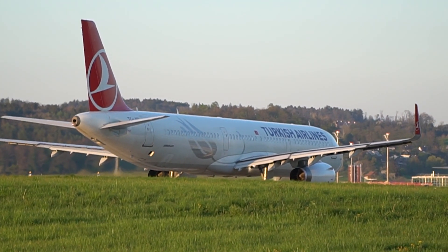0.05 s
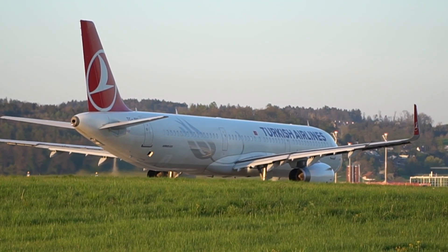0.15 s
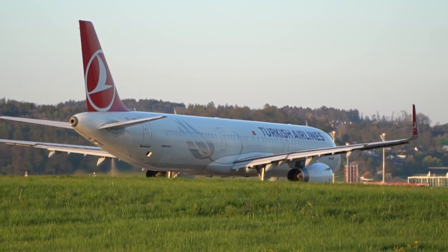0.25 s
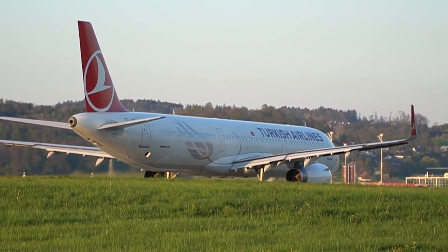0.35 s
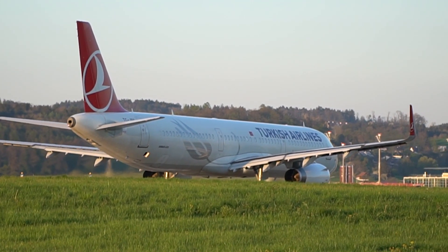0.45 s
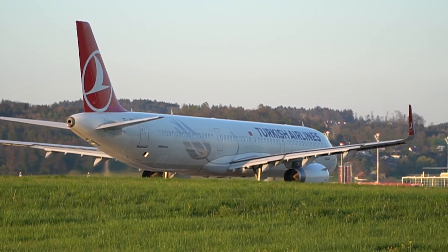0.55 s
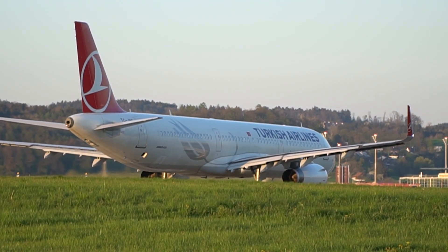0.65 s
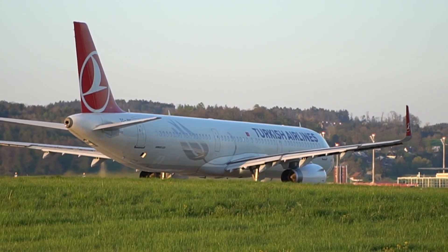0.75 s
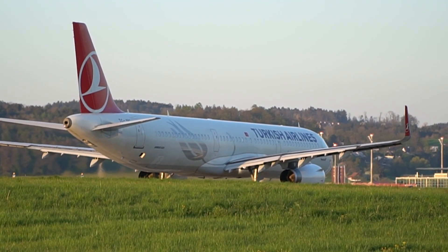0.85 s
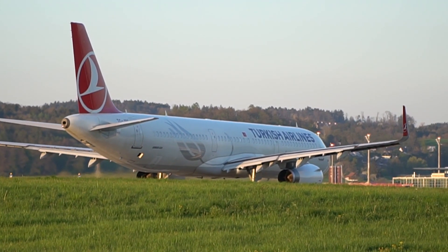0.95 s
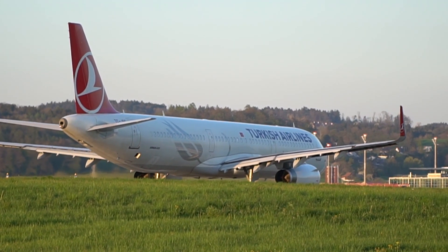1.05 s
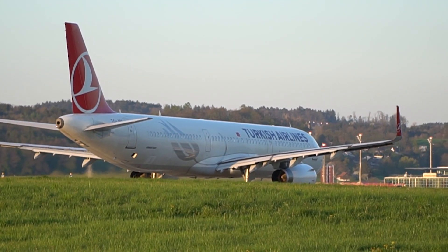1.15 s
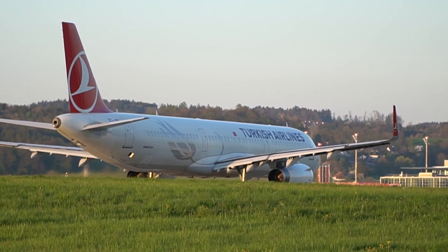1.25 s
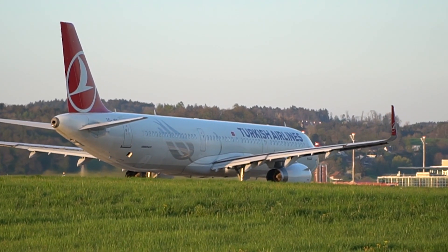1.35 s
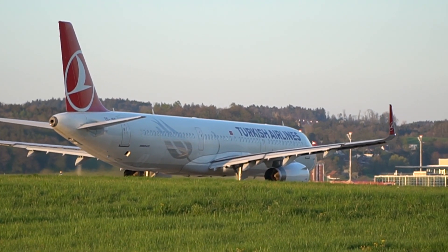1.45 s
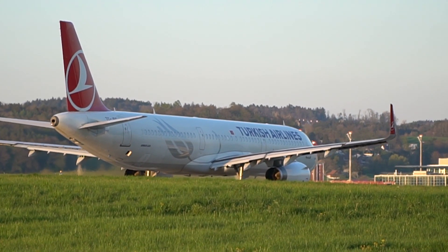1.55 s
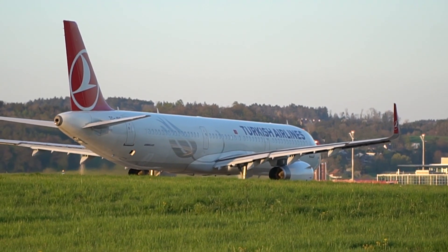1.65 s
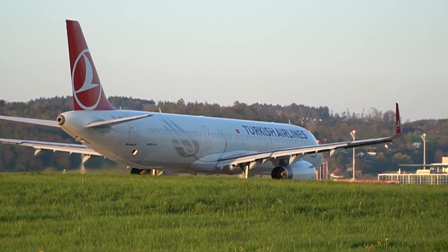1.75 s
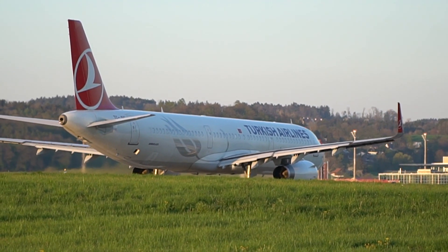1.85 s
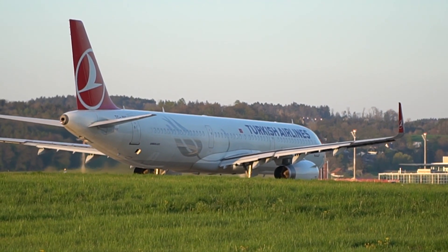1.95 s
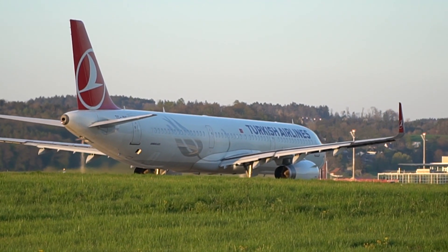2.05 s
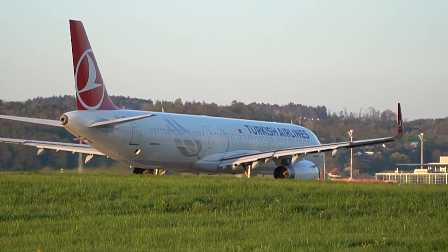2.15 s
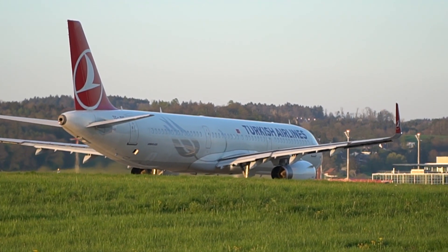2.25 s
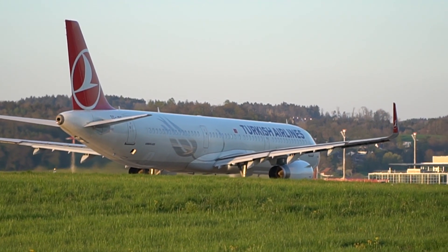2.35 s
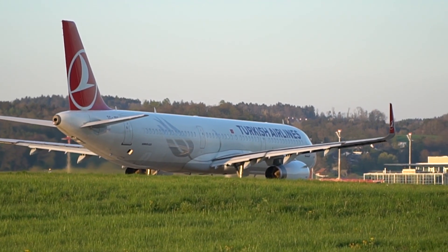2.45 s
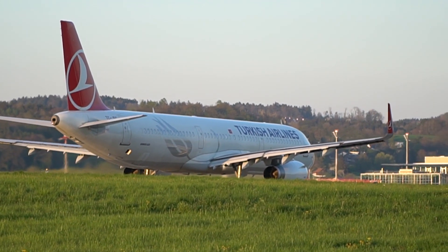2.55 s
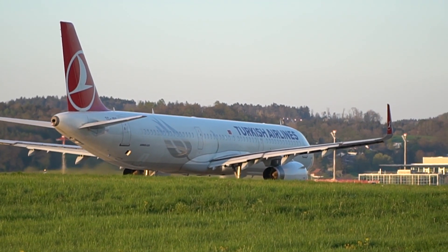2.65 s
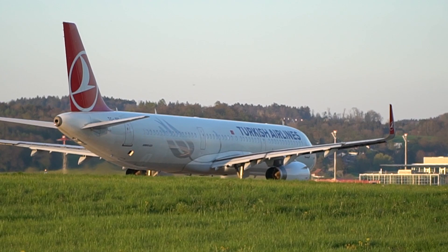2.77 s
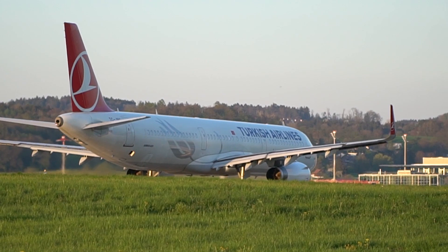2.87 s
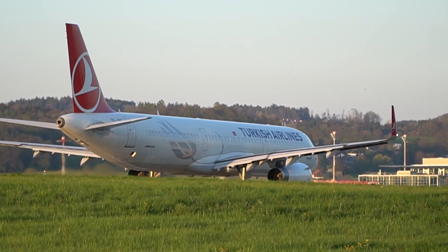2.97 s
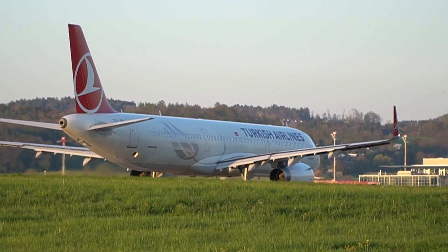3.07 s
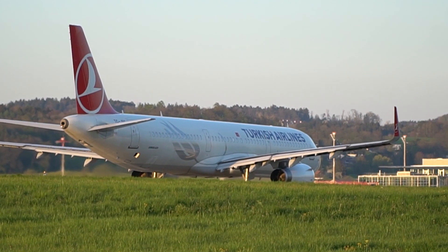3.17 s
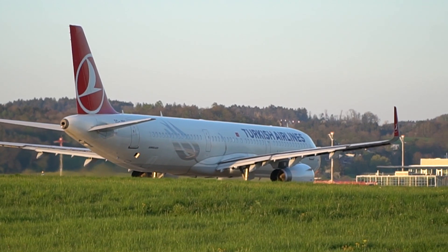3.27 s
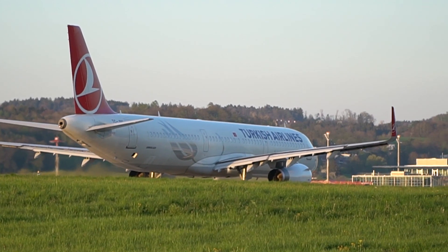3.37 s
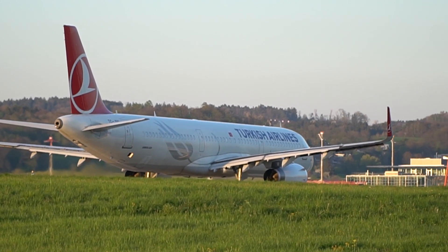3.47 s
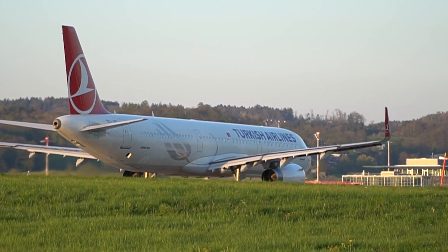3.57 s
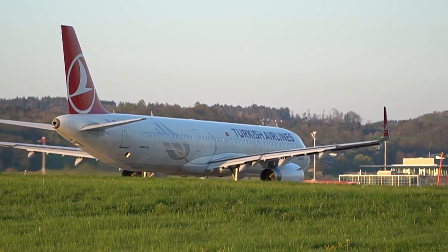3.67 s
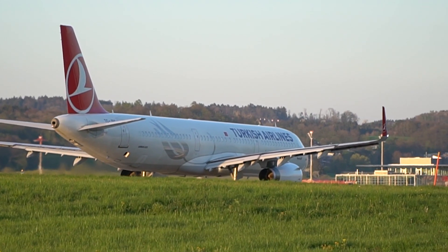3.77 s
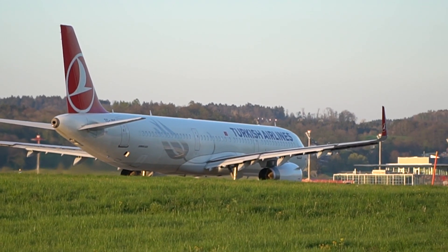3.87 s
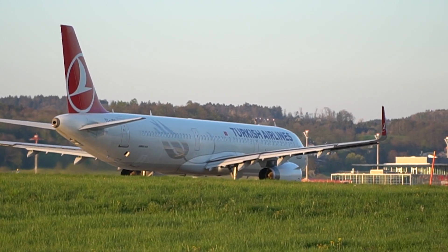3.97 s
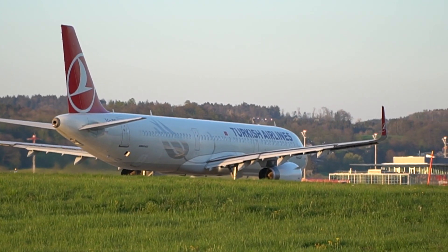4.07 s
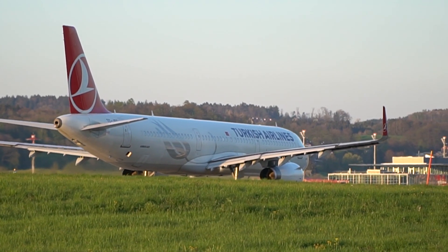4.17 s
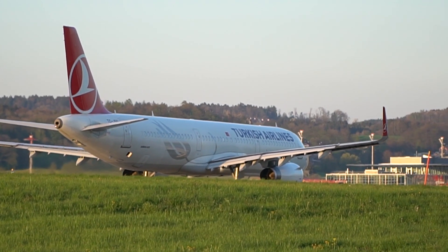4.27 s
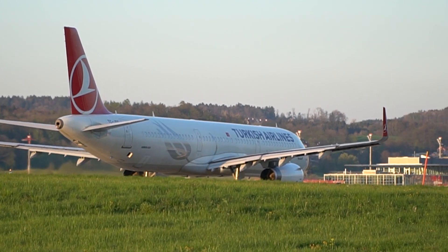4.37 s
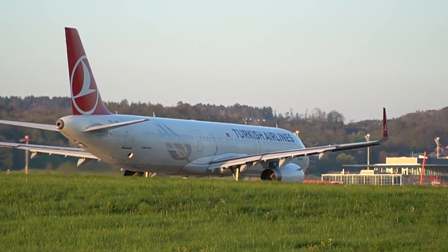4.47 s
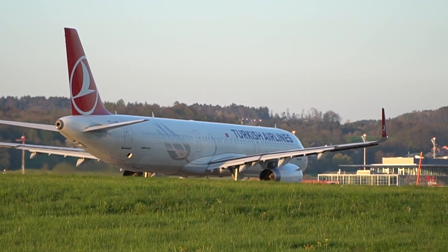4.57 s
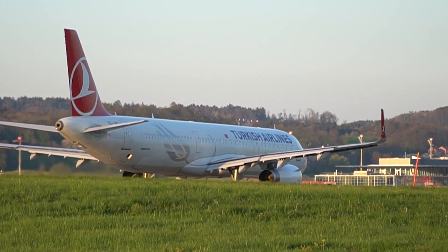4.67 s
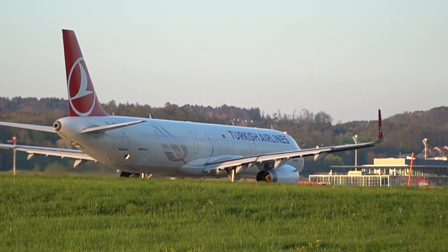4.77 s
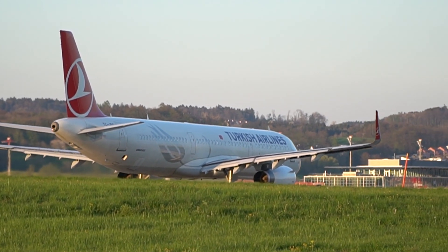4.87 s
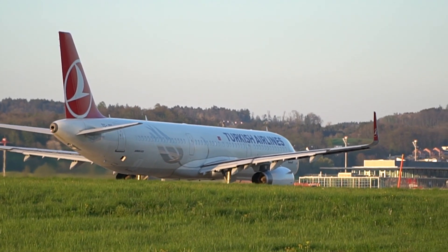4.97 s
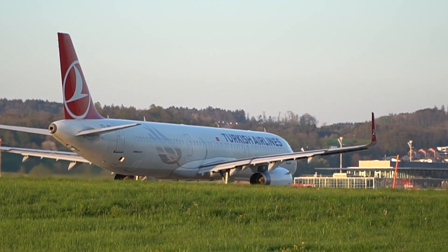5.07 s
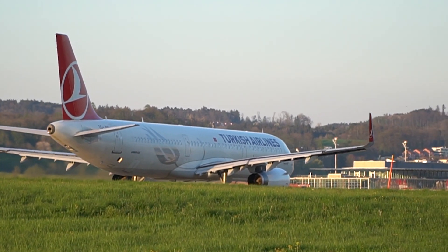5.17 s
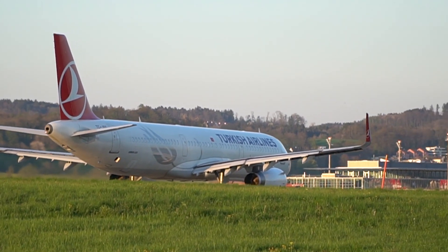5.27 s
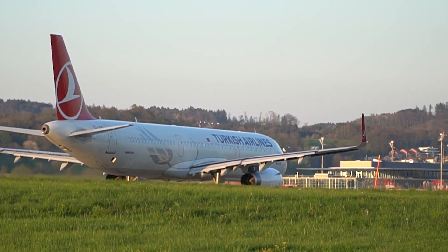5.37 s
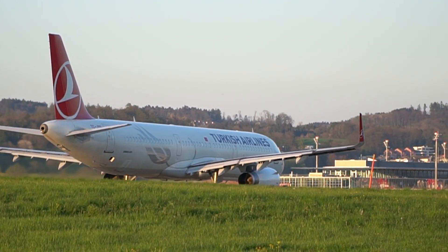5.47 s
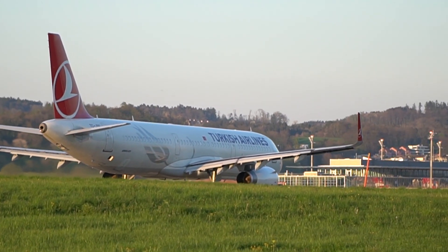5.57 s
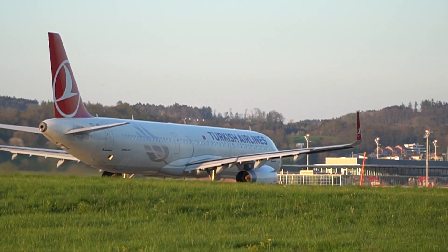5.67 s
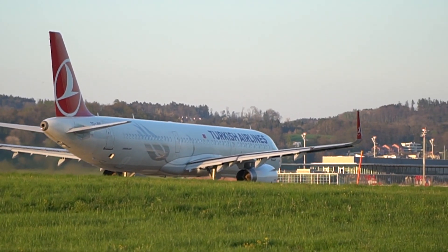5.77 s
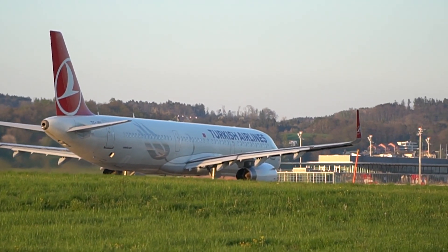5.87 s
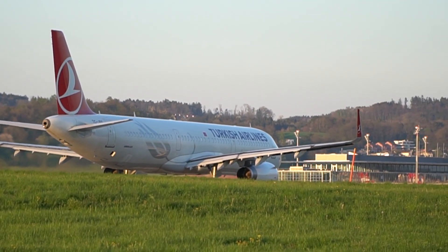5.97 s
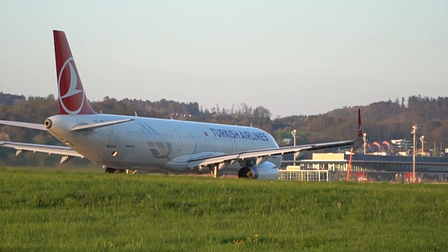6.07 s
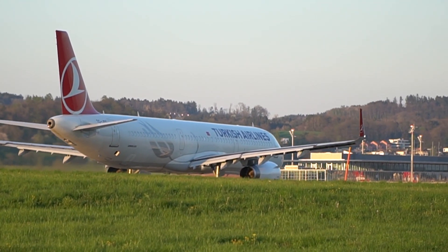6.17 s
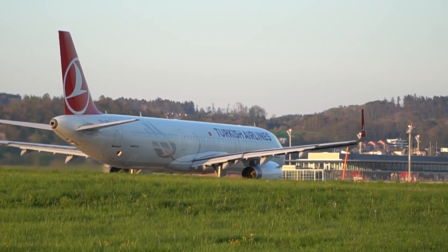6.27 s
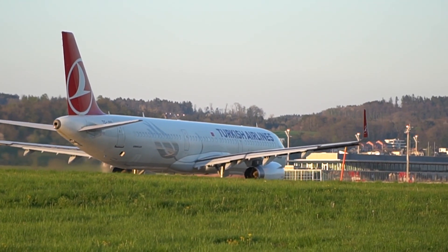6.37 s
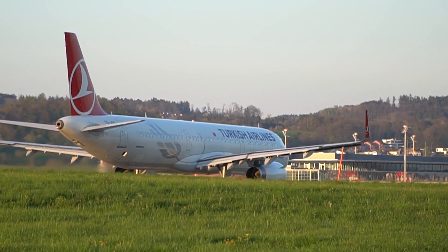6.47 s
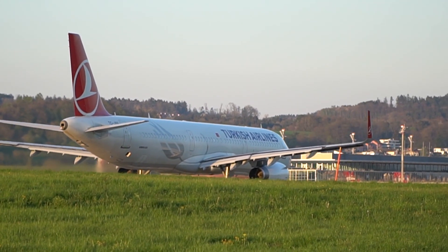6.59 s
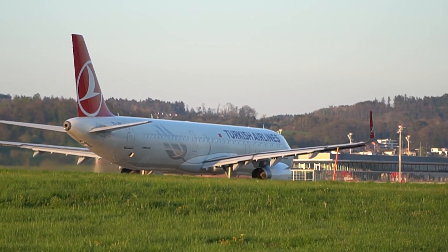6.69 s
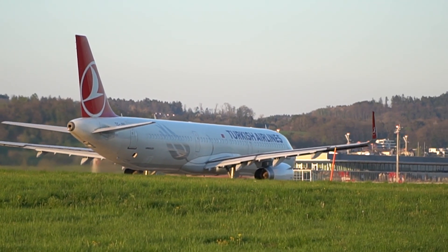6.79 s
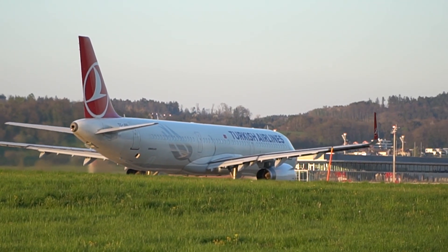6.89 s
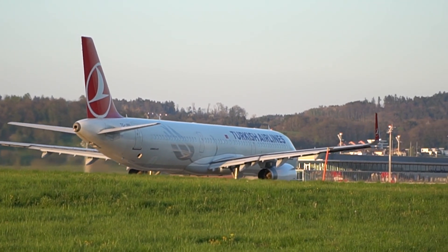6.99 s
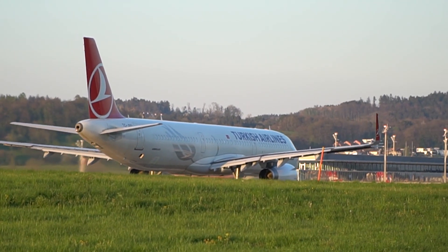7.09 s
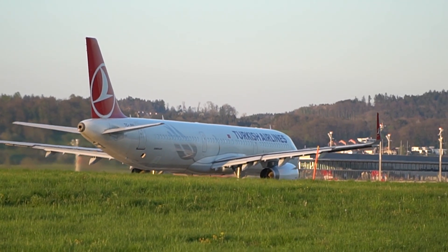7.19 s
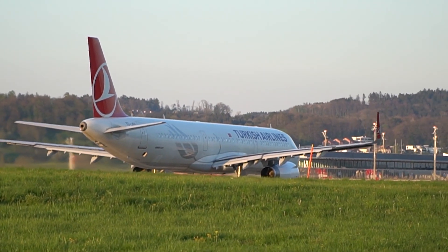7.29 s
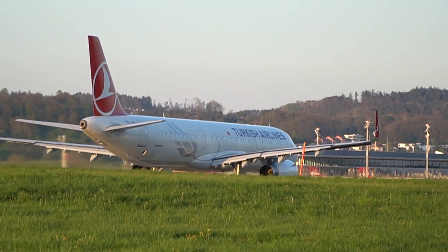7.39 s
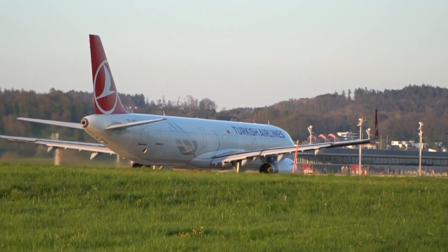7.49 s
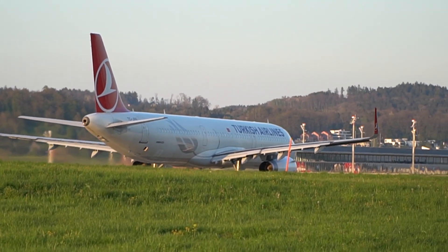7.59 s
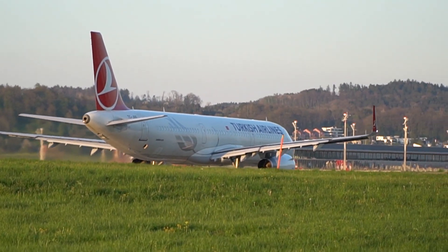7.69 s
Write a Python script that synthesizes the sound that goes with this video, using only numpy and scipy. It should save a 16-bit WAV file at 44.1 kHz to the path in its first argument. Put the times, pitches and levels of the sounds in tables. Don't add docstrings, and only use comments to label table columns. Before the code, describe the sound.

Jet engines whine ever higher with a wavering mid-way howl, then the exhaust roar swallows everything while light wind thumps on the microphone.

```python
import sys
import numpy as np
from scipy import signal
from scipy.fft import rfft, irfft, next_fast_len
from scipy.io import wavfile
from scipy.ndimage import uniform_filter1d

SR = 44100
rng = np.random.default_rng(int(sys.argv[2]) if len(sys.argv) > 2 else 0)


def inscribe(sig):
    pcm = np.round(np.clip(np.atleast_2d(sig).T, -1, 1) * 32767)
    wavfile.write(sys.argv[1], SR, pcm.astype(np.int16))


N = 341334

# (time [s], blade tone [Hz])
FAN = [(0, 722), (.5, 743), (1.1, 766), (2, 841), (2.6, 926), (3, 1022), (3.4, 1140), (3.7, 1243),
       (4.1, 1344), (4.67, 1472), (5.4, 1573), (5.8, 1668), (6.3, 1848), (6.8, 2075), (7.3, 2400),
       (7.74, 2620)]


def from_db(db):
    return np.exp(np.asarray(db) * (np.log(10) / 20))


def rms_one(x):
    return x / np.sqrt(np.mean(np.abs(x) ** 2) + 1e-20)


def ramp(span_s):
    start_s, end_s = span_s
    return np.clip((np.arange(N) / SR - start_s) / (end_s - start_s), 0, 1)


def after(start_s):
    return np.maximum(np.arange(N) / SR - start_s, 0)


def bump(centre_s, width_s):
    return np.exp(-((np.arange(N) / SR - centre_s) / width_s) ** 2)


def in_time(rows):
    s, *columns = np.transpose(rows)
    return [np.interp(np.arange(N) / SR, s, c) for c in columns]


def at_hz(points, hz):
    point_hz, value = np.transpose(points)
    return np.interp(np.log(hz), np.log(point_hz), value)


def drift(rate_hz):
    r = np.exp(-32 * np.pi * rate_hz / SR)
    noise = rng.standard_normal(N // 16 + 4002)
    slow = signal.lfilter([1], [1, -2 * r, r * r], noise)[4000:]
    return np.interp(np.arange(N) / 16, np.arange(len(slow)), rms_one(slow))


def tone(hz, level_db, width_hz, clean):
    clean = np.clip(clean, 0, 1)
    phase = 2 * np.pi * (np.cumsum(hz) / SR + rng.random())
    smear = np.sqrt(1 - clean)
    along = np.sqrt(2 * clean) + smear * drift(width_hz)
    across = smear * drift(width_hz)
    twinkle_db = 1.2 * np.minimum(2 * clean / .5, 1) * drift(5.7)
    return from_db(level_db + twinkle_db) * (along * np.cos(phase) + across * np.sin(phase))


def breeze():
    # (time [s], peak level [dB])
    strong_pops = [(1.435, -27.5), (1.585, -31), (1.732, -19.5), (1.759, -23.5), (1.864, -25), (1.996, -24),
                   (2.027, -29), (2.07, -27), (2.158, -26), (2.361, -24), (2.401, -20.5), (2.598, -26),
                   (2.736, -32), (2.776, -34), (2.86, -34), (3.001, -26), (3.226, -34), (3.454, -31),
                   (3.722, -30), (4.212, -23), (4.617, -25), (5.0, -28), (5.227, -29), (5.708, -23),
                   (5.823, -21), (5.99, -26), (6.157, -26), (6.263, -28), (6.454, -23), (6.487, -27)]
    calm_db, breeze_db, lag_ms = -56.5, -40.5, 0.63
    gust_db = calm_db + (breeze_db - calm_db) * ramp((1.25, 1.4))
    gust_db = gust_db - 11.5 * bump(3.9, 0.74)
    gust_db = gust_db + 3.5 * drift(1.2)
    gust_db = gust_db + 3.5 * ramp((5.1, 5.23))

    sizes = from_db(3.5 * np.minimum(rng.exponential(1, N), 3.5)) * rng.choice([-1, 1], N)
    weak = sizes * (rng.random(N) < 260 / SR)
    strong = np.zeros(N)
    strong[[round(s * SR) for s, db in strong_pops]] = -from_db(np.array(strong_pops)[:, 1])

    rounded = signal.butter(2, 460, fs=SR, output="sos")
    thin = signal.butter(2, 178, "high", fs=SR, output="sos")
    shape = np.vstack([rounded, rounded, thin])
    eddies = from_db(gust_db + 2.0) * rms_one(signal.sosfilt(shape, weak))
    eddies = eddies + from_db(45.5) * np.roll(signal.sosfilt(shape, strong + 1e-18), -80)
    late = np.interp(np.arange(N) - lag_ms * SR / 1000, np.arange(N), eddies)
    return np.array([late, eddies])


def howl():
    # (time [s], pitch [Hz], level [dB])
    howl_path = [
        (0, 1128, -45.5),
        (1.6, 1166, -42.5),
        (2.4, 1194, -39),
        (3.42, 1163, -41.5),
        (3.55, 1190, -28),
        (4.55, 1250, -28),
        (4.8, 1274, -38),
        (5.6, 1235, -42.5),
        (7.74, 1300, -58.5),
    ]
    hz, level_db = in_time(howl_path)
    return tone(hz, level_db, width_hz=12, clean=.85)


def compressor():
    # (time [s], upper compressor tone [Hz])
    shaft = [(0, 6800), (2, 7490), (4.2, 8480), (4.8, 8610), (7.74, 8900)]
    (hz,) = in_time(shaft)
    since = np.arange(N) / SR - 4.4
    upper_db = -64 + np.minimum(1.5 * since, -6 * since)
    halo_db = -51.5 + np.minimum(7.0 * since, -5 * since)
    lower_db = -52 - 13.5 * after(2.7)
    upper = tone(hz, upper_db, width_hz=20, clean=.3)
    halo = tone(1.05 * hz, halo_db, width_hz=1000, clean=0)
    lower = tone(.574 * hz, lower_db, width_hz=18, clean=0.27)
    return upper + halo + lower


def fans():
    # (blade tone [Hz], level [dB])
    blade_levels = [(722, -48), (940, -30.5), (1160, -28.5), (1250, -33), (1420, -33.5), (1520, -28.5),
                    (1720, -32), (2100, -23)]
    # (blade tone [Hz], level [dB])
    octave_levels = [(722, -53), (770, -48.5), (860, -59), (1100, -44.5), (1400, -36), (1560, -38.5),
                     (1680, -49), (1800, -30)]
    # (multiple of blade tone [ratio], level [dB], start of fade [s])
    further_tones = [
        (4.49, -42.5, 2.9),
        (6.52, -56.5, 2.0),
        (3.0, -62, 7.0),
    ]
    whine = 4.025
    idle_db, top_db = -36.5, -30
    turn_s, turn_db_per_s = 7.11, -41

    (hz,), s = in_time(FAN), np.arange(N) / SR
    hz = uniform_filter1d(hz, size=9000)
    away_db = turn_db_per_s * after(turn_s)
    tone_db = at_hz(blade_levels, hz) + away_db
    octave_db = at_hz(octave_levels, hz) + turn_db_per_s * after(turn_s - .2)

    sinking_db = np.maximum(top_db - 6.0 * after(1.3), -49) - 14 * after(6.3)
    whine_db = sinking_db + 3.0 * bump(3.0, .3)
    whine_clean = .8 - .45 * ramp((2.2, 3.2)) + .3 * ramp((4.2, 5))
    swell_db = (idle_db - top_db) * (1 - ramp((.93, .98)))
    early_db = (idle_db - top_db) * (1 - ramp((.73, .78)))

    lag = .972 - .023 * bump(4.1, 1.0)
    between = whine * (1 + lag) / 2 * hz
    halo_db = -37.5 - 9.5 * ramp((3.25, 4.3)) + .7 * away_db
    out = tone(1.025 * between, halo_db - 3.0 * after(4.6), width_hz=170, clean=0)
    out = out + tone(between, halo_db + 1.0 + 2.75 * (s - 4), width_hz=750, clean=0)

    for speed, fan_db, engine_db in [(1, 0, swell_db), (lag, -7, -1 + early_db)]:
        fan_clean = .75 - .4 * ramp((4.3, 4.8))
        out = out + tone(speed * hz, tone_db + fan_db, width_hz=22, clean=fan_clean)
        out = out + tone(2 * speed * hz, octave_db + fan_db + 2, width_hz=40, clean=.3)
        out = out + tone(whine * speed * hz, whine_db + engine_db, width_hz=28, clean=whine_clean)

    for multiple, db, fades_s in further_tones:
        fade_rate = 4 + 20 * (multiple < 5)
        row_db = db - fade_rate * after(fades_s) - 25 * after(min(fades_s * 1.2 + 1.9, 7))
        out = out + tone(multiple * hz, row_db, width_hz=40, clean=.1)
    return out


def exhaust(shared_db, patchy_db):
    # (frequency [Hz], level [dB per Hz])
    roar_colour = [(25, -41), (60, -16.5), (100, -2), (200, 0.5), (232, -8.5), (255, -13.5), (420, -8.5),
                   (1000, -3), (1700, -13.5), (3000, -12), (4500, -19), (6500, -27), (9000, -40),
                   (12000, -58)]
    # (frequency [Hz], left-right likeness [0-1])
    likeness = [(60, 1.0), (180, 1), (550, .998), (1100, 1), (1900, 0.83), (4500, 0.68), (8000, 0.58),
                (15000, .6)]
    # (frequency [Hz], share of thrust change [ratio])
    answer = [(30, 1.2), (80, 1.3), (170, 1.0), (350, 1.2), (650, 1.014), (2000, 1.05), (4000, 1.105),
              (9000, 1.13)]
    # (time [s], thrust under full [dB], extra brightness from aim [dB per octave])
    thrust_path = [(0, -18.5, 1.5), (.7, -19, 1.5), (1.5, -20, 2.5), (2.1, -17.5, 1.5), (3, -17.5, 1),
                   (3.8, -15.5, 1), (4.6, -14.5, 1.5), (5.2, -12.5, 0), (5.7, -11, 1.5), (6.1, -9, 1.8),
                   (6.5, -5.5, 2.1), (6.85, -2, 1.5), (7.05, -0.5, 1.0), (7.3, 0, -0.05), (7.74, 0, -1.6)]

    size = next_fast_len(N)
    hz = np.arange(1, size // 2 + 2) * SR / size
    mid, side = rfft(rng.standard_normal((2, size))) * from_db(at_hz(roar_colour, hz))
    unlike = np.sqrt(1 - np.clip(at_hz(likeness, hz), 0, 1)) * .5
    pair = np.array([mid + unlike * side, mid - unlike * side])
    pair = pair / np.sqrt(np.mean(irfft(pair, size) ** 2))

    (thrust_db, aim), (blade_hz,) = in_time(thrust_path), in_time(FAN)
    together = drift(5.4)
    loaded = bump(4.7, 1.1)
    out = np.zeros((2, N))
    for centre in 22 * 2 ** np.arange(0, 10.1, 2 / 3):
        share = np.clip(1 - np.abs(np.log2(hz / centre)) * 1.5, 0, 1)
        octaves_off = np.log2(centre / (1.04 * blade_hz))
        rush_db = 5 * loaded * np.exp(-(octaves_off / 0.63) ** 2)
        bright_db = aim * max(np.log2(centre / 1540), 0)
        flicker_db = shared_db * together + patchy_db * drift(10.5)
        level_db = at_hz(answer, centre) * thrust_db + bright_db + rush_db + flicker_db
        out += from_db(level_db) * irfft(pair * share, size)[:, :N]
    return from_db(-8.5) * out


def over_grass(x):
    # (lag [ms], strength [0-1], phase turn [rad])
    ground_echo = [
        (.945, 0.13, 1.75),
        (.955, 0.2, 1.39),
    ]
    # (frequency [Hz], left minus right [dB])
    shade = [(60, -0.5), (380, -0.5), (950, -0.4), (1400, 0.5), (2400, -1.5), (4400, -1.5), (8000, 2.5),
             (15000, -2)]
    # (frequency [Hz], width [Hz], level [dB])
    hollow = [(1190, 450, 5.5), (1399, 89, -5.5), (1698, 327, 4.5), (2460, 350, -2.5), (7010, 430, -4.5)]

    size = next_fast_len(N + 4096)
    hz = np.arange(1, size // 2 + 2) * SR / size
    paths = []
    for ms, strength, turn in ground_echo:
        delay = np.exp(-1j * (2 * np.pi * hz * ms / 1000 + turn))
        paths.append(1 + np.clip(strength, 0, .95) * delay)
    dip_hz, sharpness, depth = 2050, 2.55, 0.62
    paths[0] = paths[0] * (1 - depth / (1 + 1j * sharpness * (hz / dip_hz - dip_hz / hz)))
    body_db = sum(db / (1 + (2 * (hz - centre_hz) / width) ** 2) for centre_hz, width, db in hollow)
    air_db = -7.5 * (hz / 10000) ** 2
    level_db = air_db + body_db + at_hz(shade, hz) * [[.5], [-.5]] - 1.5
    spectrum = rfft(np.pad(x, [(0, 0), (0, 2048)], "reflect"), size)
    return irfft(spectrum * np.array(paths) * from_db(level_db), size)[:, :N]


def scene():
    wind = breeze()
    engines = howl() + compressor() + fans()
    jet = exhaust(shared_db=.35, patchy_db=.7)
    return over_grass(jet + engines) + wind


def band_limit(x):
    return signal.sosfilt(signal.butter(12, 15910, fs=SR, output="sos"), x)


def record(dry):
    x = dry + from_db(-60.5) * rng.standard_normal(dry.shape)
    x = signal.sosfilt(signal.ellip(10, .5, 60, 15250, fs=SR, output="sos"), x)
    closing = np.sin(np.pi / 2 * ramp((N / SR, N / SR - .004)))
    mix = np.clip(x, -1.0, 1.0) * closing
    return band_limit(mix)


dry = scene()
out = record(dry)
inscribe(out)
```